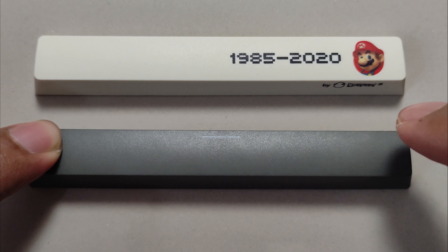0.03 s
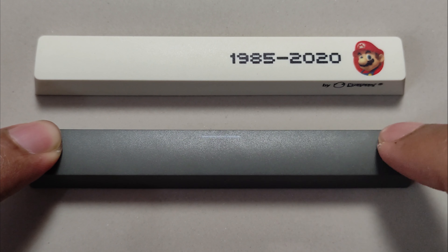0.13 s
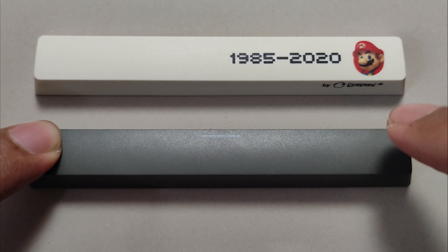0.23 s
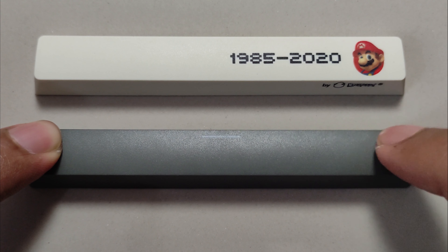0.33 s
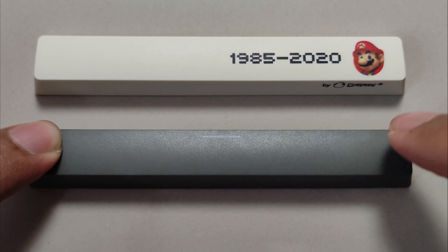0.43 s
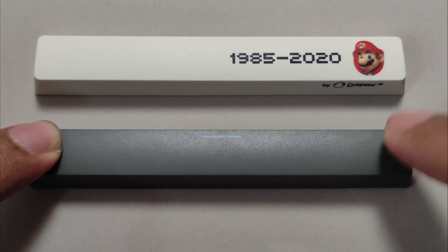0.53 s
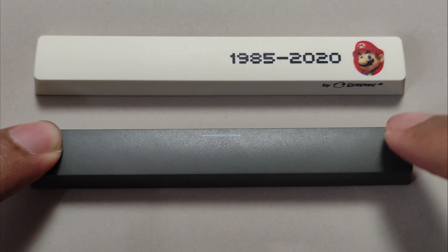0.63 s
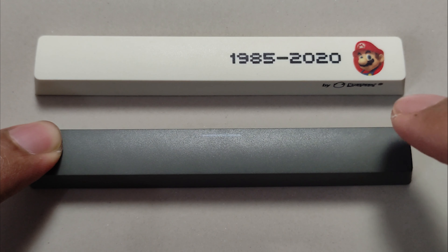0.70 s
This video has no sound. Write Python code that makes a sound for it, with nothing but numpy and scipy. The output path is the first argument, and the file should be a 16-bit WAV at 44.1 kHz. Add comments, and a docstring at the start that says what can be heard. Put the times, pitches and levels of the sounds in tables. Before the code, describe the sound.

Sharp, hollow plastic clicks repeat as fingers rock a long keycap on a desk.

```python
"""In a small room, a long plastic keycap is rocked on a hard desk close to a stereo microphone.
It clacks down about four times a second: one edge touches first, then the rim lands and chatters.
Each impact excites the damped modes of the hollow shell and of the desk for a few milliseconds.
The cap ticks faintly as it shifts under the finger. The ceiling and walls return echoes and a
short reverberant tail, above a faint low rumble."""
import sys
import numpy as np
from scipy import signal
from scipy.fft import rfft, irfft
from scipy.io import wavfile

SR = 44100
rng = np.random.default_rng(int(sys.argv[2]) if len(sys.argv) > 2 else 0)


def wav_out(sig):
    """Save sig, one row per channel (or a flat mono array), as 16-bit PCM at SR to the path in sys.argv[1]."""
    wavfile.write(sys.argv[1], SR, np.round(np.clip(np.atleast_2d(sig).T, -1, 1) * 32767).astype(np.int16))


N = 59535
SIDES = np.array([[1], [-1]])  # left, right


def undb(db):
    """Amplitude ratio of a level in decibels."""
    return 10 ** (np.asarray(db) / 20)


def unit_rms(x):
    """Normalisation to rms 1."""
    return x / np.sqrt(np.mean(x ** 2))


def unit_energy(x):
    """Normalisation to a mean energy of 1 per channel."""
    return unit_rms(x) / np.sqrt(x.shape[1])


def decay(t, t60):
    """Exponential damping, 60 dB down after t60."""
    return np.exp(-np.log(1000) * t / t60)


def add(out, x, at_s):
    """Superposition of x on out from a given time."""
    start = int(round(at_s * SR))
    length = min(x.shape[1], out.shape[1] - start)
    out[:, start:start + length] += x[:, :length]


def colour(points, size):
    """Stereo spectral envelope through points of Hz, dB and, optionally, left minus right dB."""
    hz, db, *pan = np.array(points).T
    f = np.maximum(np.fft.rfftfreq(size, 1 / SR), 1)
    return undb([np.interp(np.log(f), np.log(hz), db + side * sum(pan) / 2) for side in (1, -1)])


def noise(points, size):
    """Spectral shaping of two uncorrelated white noises, scaled to rms 1."""
    white = rng.standard_normal((2, size))
    return unit_rms(irfft(rfft(white) * colour(points, size), size))


def pulse(points, size):
    """Minimum-phase impulse: the sharpest causal click with a given spectrum, at unit energy."""
    cepstrum = irfft(np.log(colour(points, size)), size)
    k = np.arange(size)
    causal = cepstrum * (1 + (k > 0)) * (k < size // 2)
    return unit_energy(irfft(np.exp(rfft(causal)), size))


# Spectrum of the rumble. Each row: frequency in Hz, relative spectral density in dB.
RUMBLE_SPECTRUM = [(25, -26), (50, -16.5), (90, 1), (170, 2.5), (300, -2.5), (530, -14.5), (1000, -20.5),
                   (2000, -28.5), (4000, -26), (6000, -37), (12000, -41)]


def background(wide_hz=700, hum_hz=184.4, hum_width_hz=14.8):
    """Partly coherent noise: rumble alike in both ears, wide hiss and a wavering narrow-band hum."""
    f = np.fft.rfftfreq(N, 1 / SR)
    mid, side = noise(RUMBLE_SPECTRUM, N)
    side = irfft(rfft(side) * np.clip(f / wide_hz, undb(-14), 1), N)
    hum_band = 1 / (1 + ((f - hum_hz) / hum_width_hz) ** 2)
    hum = unit_rms(irfft(rfft(rng.standard_normal(N)) * hum_band, N))
    t = np.arange(N) / SR
    swell_db = 3 * np.exp(-((t - 0.88) / 0.1) ** 2)  # one brief rise in level
    return undb(swell_db) * (undb(-66) * (mid + SIDES * side) + undb(-69.5) * hum)


# Spectrum of the tail and the wall echoes. Each row: frequency in Hz, relative level in dB.
ROOM_SPECTRUM = [(240, -40), (400, -3.5), (686, -8.5), (1020, -10), (1440, -11), (1670, -0.5),
                 (2230, -15.5), (3120, 1), (4170, -1.5), (5590, -11), (7700, -20), (8770, -10.5),
                 (10000, -26.5), (12100, -16), (13000, -47)]
# Scattered wall reflections. Each row: delay in seconds, level in dB.
WALL_ECHOES = [(0.0177, -31.5), (.0255, -28), (0.037, -36)]


def reverberation(build_s=0.0056, pan_db=1.5):
    """Diffuse reflection of one clack: a tail that builds and decays, with smeared wall echoes."""
    t = np.arange(SR // 2) / SR
    tail = noise(ROOM_SPECTRUM, len(t)) * decay(t, t60=0.28) * (1 - np.exp(-t / build_s))
    out = undb(-17) * unit_energy(tail)
    for delay_s, db in WALL_ECHOES:
        echo = noise(ROOM_SPECTRUM, len(t)) * decay(t, t60=0.015)
        add(out, undb(db) * unit_energy(echo), delay_s)
    return out * undb(SIDES * pan_db / 2)


# Spectrum of the ceiling echo. Each row: frequency in Hz, relative level in dB.
CEILING_SPECTRUM = [(500, -9), (1750, 3.5), (2400, -6), (2750, 0), (2930, 22), (3200, -17), (4200, -5.5),
                    (5600, 0), (12000, 1.5)]


def ceiling_echo(x, delay_s=0.019):
    """Specular reflection, coloured by directivity: the cap sends its ring near 3 kHz mostly upward."""
    response = np.zeros((2, SR // 10))
    add(response, undb(-21) * pulse(CEILING_SPECTRUM, SR // 10), delay_s)
    return signal.fftconvolve(x, response, axes=1)[:, :x.shape[1]]


# Spectrum of a tick. Each row: frequency in Hz, relative spectral density in dB.
TICK_SPECTRUM = [(1000, -17), (4000, 1), (9000, -3), (12000, 3), (13500, 4)]


def tick():
    """Friction: the rim slips on the desk in a tiny burst of bright noise."""
    t = np.arange(SR // 20) / SR
    return noise(TICK_SPECTRUM, len(t)) * decay(t, t60=0.023)


def ring(modes, t, tilt_db, pivot_hz=3480, rise_s=0.00035):
    """Free vibration: a sum of damped modes, each with its own stereo balance and phase lag."""
    out = 0
    for hz, db, t60, pan_db, lag_s in modes:
        detune, scatter_db = rng.normal(0, [0.004, 0.7])  # no two blows are alike
        gain = undb(db + scatter_db + tilt_db * np.log2(hz / pivot_hz) + SIDES * pan_db / 2)
        phase = 2 * np.pi * hz * (1 + detune) * (t + SIDES * lag_s / 2)
        out = out + gain * decay(t, t60) * np.sin(phase)
    return out * (1 - np.exp(-t / rise_s))


# Modes of the hollow shell. Each row: frequency in Hz, relative level in dB, 60 dB decay time in
# seconds, left minus right in dB, lag of the right microphone in seconds.
SHELL_MODES = [(1559, -2, .014, 3, 24e-5), (1700.5, -8, 0.022, 9.5, 24e-5), (2465, -7.5, 0.01, -9.5, 5e-5),
               (3075, -14, 0.038, -3, 14e-5), (3239, -6, 0.037, 8, 14e-5), (3560, -18, 0.0062, 8, -9e-5),
               (3964, -7.5, 0.019, 1, -0.00107), (4157, -8.5, 0.018, -6.5, -0.000028),
               (4710, -8, 0.013, 1.5, -0.0046), (5252, -11, 0.0083, 9, 0.0038),
               (6240, -16.5, 0.023, 10, -6e-5), (8600, -23.5, 0.016, 18.5, 0), (11100, -24, .012, -8.5, 0),
               (11820, -28, 0.012, -10, 0)]
# Modes of the desk. Each row reads as for the shell.
DESK_MODES = [(582, -17.5, 0.021, 2, 0.00009), (815, -17.5, 0.023, 7.7, 0.000061),
              (945, -5, 0.011, 7.2, 0.000038), (1139, -9.5, .01, 3.5, 0.000064)]
# Spectrum of the contact crack and the chatter. Each row: frequency in Hz, relative spectral
# density in dB, left minus right in dB.
CONTACT_SPECTRUM = [(403, -14, -1), (2000, -15, 5), (2790, -2, -1.5), (4460, 4, -7), (5890, -4.5, 7.5),
                    (7630, -12.5, 8), (9340, -5.5, 10.5), (10000, -15.5, 3), (12000, -14.5, -10.5)]
TOUCH_LEAD_S = 0.00135  # the first edge touches this far ahead of the rim


def clack(knock_db, tilt_db):
    """Impact excitation: an edge touches, then the rim lands, rings shell and desk, and chatters."""
    t = np.arange(SR // 10) / SR
    shell = undb(-20.5) * ring(SHELL_MODES, t, tilt_db)
    crack = undb(-10.5) * pulse(CONTACT_SPECTRUM, len(t))
    desk = undb(-23 + knock_db) * ring(DESK_MODES, t, tilt_db=0)
    chatter = undb(-14) * unit_energy(noise(CONTACT_SPECTRUM, len(t)) * decay(t, t60=0.026))
    out = undb(-17) * (shell + crack)  # the light first touch
    add(out, shell + crack + desk + chatter, TOUCH_LEAD_S)
    return out


# Shifts of the cap under the finger. Each row: start in seconds, level in dB.
SHIFTS = [(0.044, -50.5), (0.263, -50), (.483, -52)]
# Landings of the rim. Each row: time in seconds, gain in dB, extra gain of the desk knock in dB,
# treble tilt of the shell in dB per octave.
LANDINGS = [(-0.0065, -3.5, 4, -2.5), (0.2066, -2.5, -6, 1), (0.4330, -3, -4.5, 0.5), (0.6463, 1.5, 1, 0.5),
            (0.8571, 0.5, -1.5, 0.5), (1.1216, 0, 0.5, -.5)]


def scene(radiation_hz=432):
    """Superposition of the rocking keycap's direct sound, its reflections and the background."""
    run_in = SR // 10  # the rocking is already under way
    direct, reverberant = np.zeros((2, 2, N + run_in))
    room_answer = reverberation()
    for at_s, db, knock_db, tilt_db in LANDINGS:
        add(direct, undb(db) * clack(knock_db, tilt_db), at_s + run_in / SR - TOUCH_LEAD_S)
        add(reverberant, undb(db) * room_answer, at_s + run_in / SR)
    for at_s, db in SHIFTS:
        add(direct, undb(db) * tick(), at_s + run_in / SR)
    # So small a body radiates almost no bass.
    bass_cut = signal.butter(4, radiation_hz, "high", fs=SR, output="sos")
    keycap = signal.sosfilt(bass_cut, direct + ceiling_echo(direct) + reverberant)
    return keycap[:, run_in:] + background()


def record(dry):
    """Band limiting: a steep elliptic low-pass removes the treble above 12.3 kHz."""
    return signal.sosfilt(signal.ellip(8, 0.2, 70, 12300, fs=SR, output="sos"), dry)


dry = scene()
out = record(dry)
wav_out(out)
```